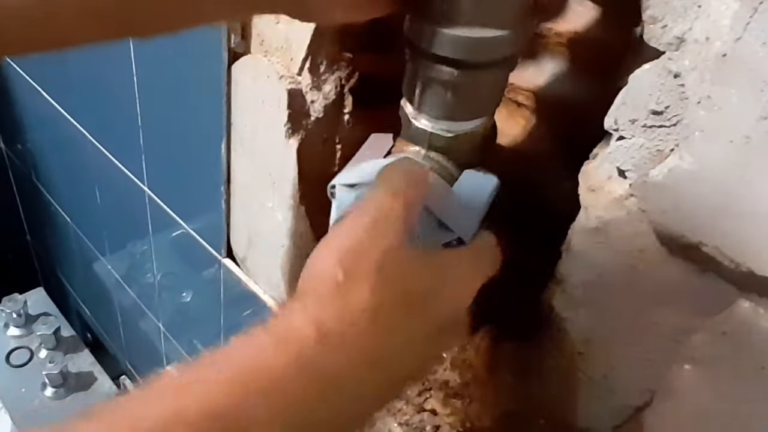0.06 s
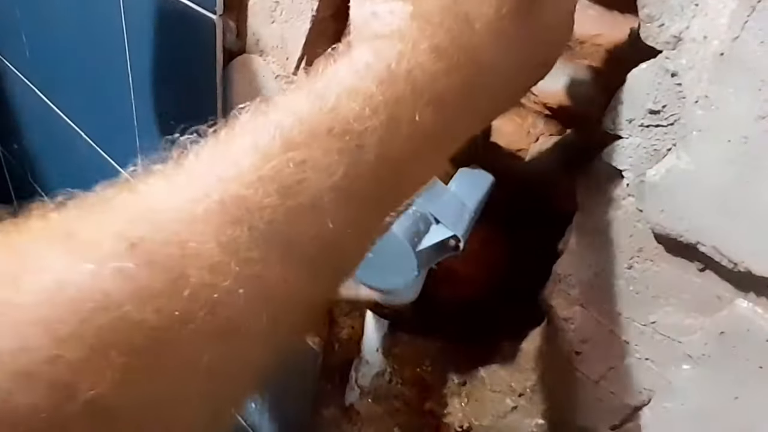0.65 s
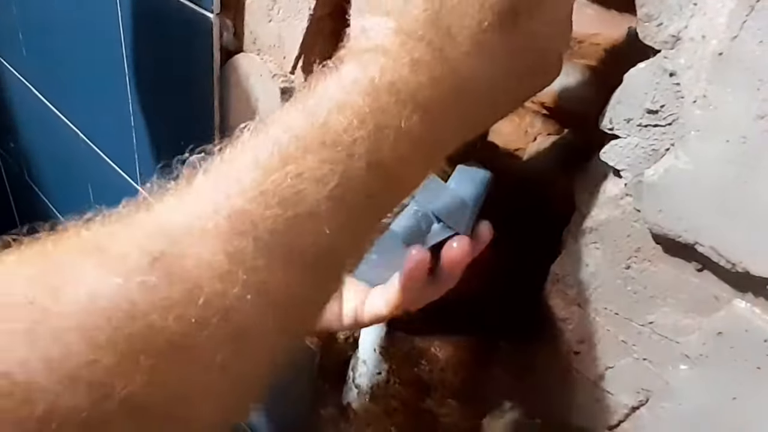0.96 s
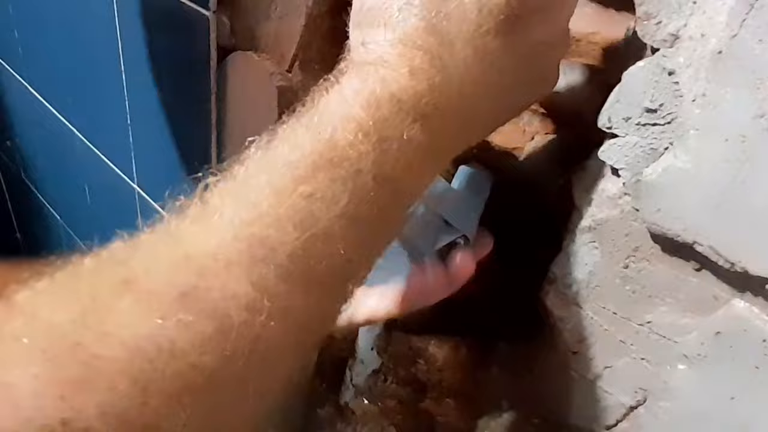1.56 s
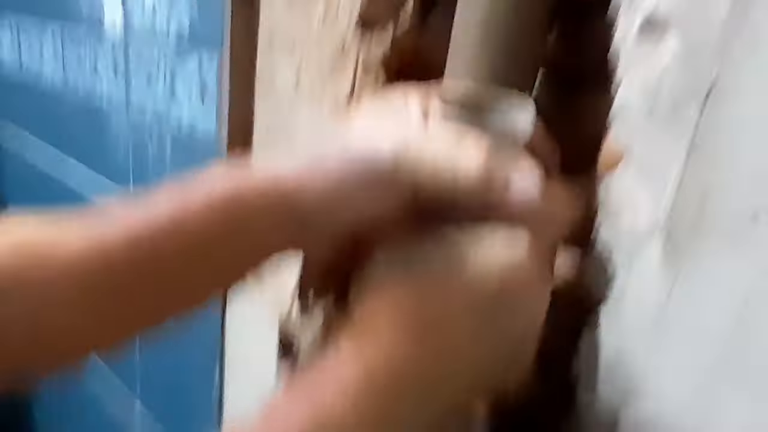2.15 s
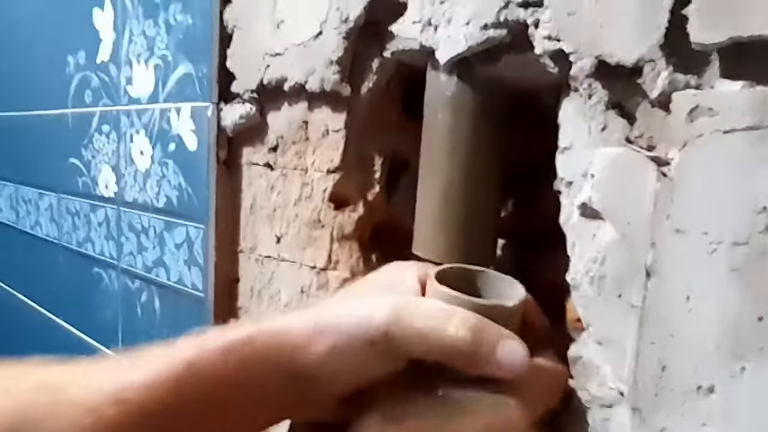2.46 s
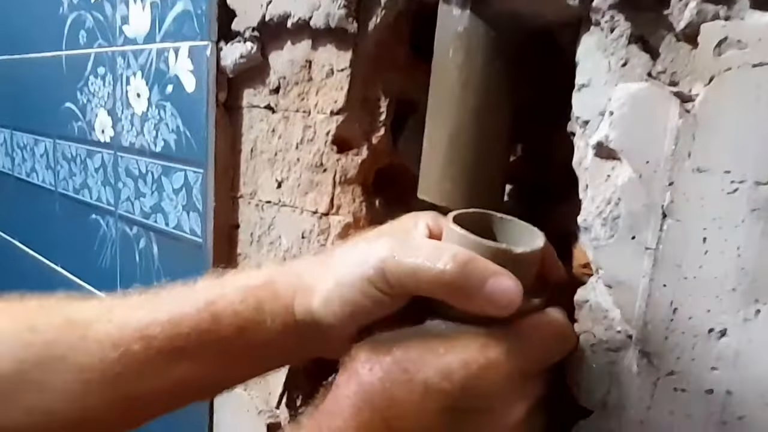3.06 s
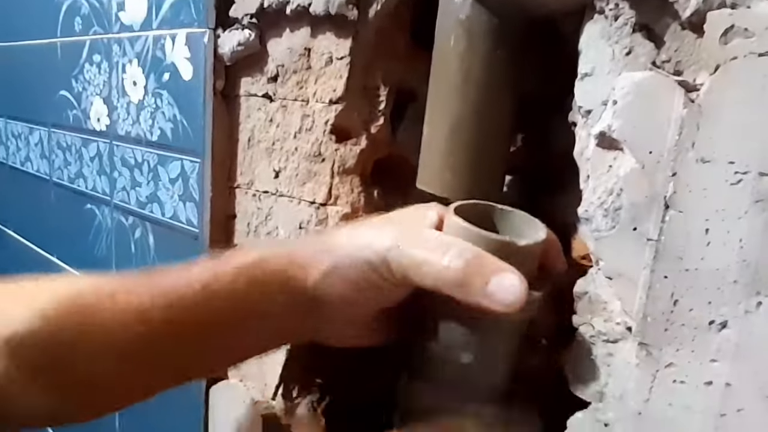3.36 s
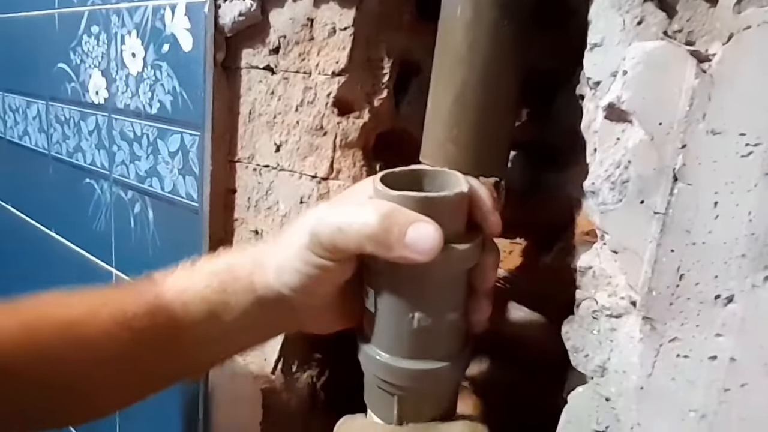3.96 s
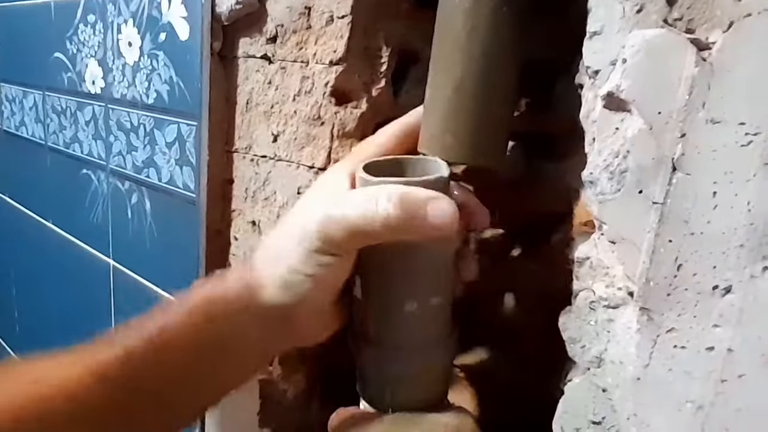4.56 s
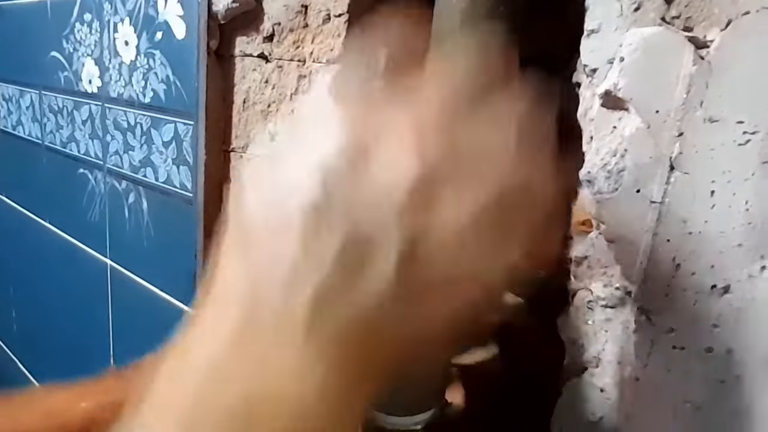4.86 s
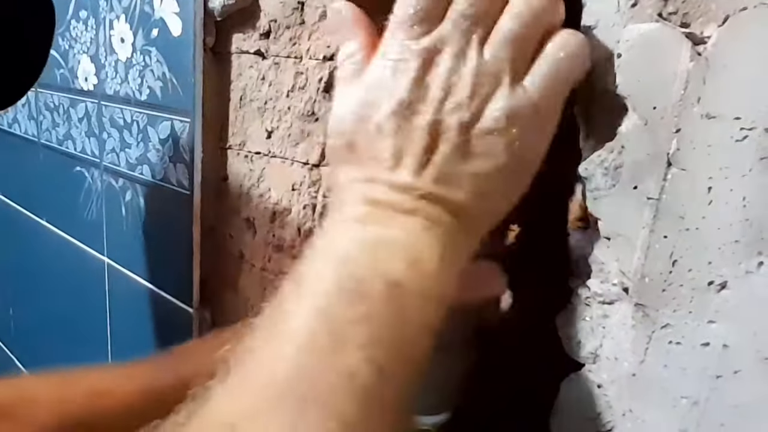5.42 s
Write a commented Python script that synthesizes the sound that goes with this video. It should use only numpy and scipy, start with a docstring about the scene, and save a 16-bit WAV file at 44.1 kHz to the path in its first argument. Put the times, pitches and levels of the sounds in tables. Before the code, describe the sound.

Plastic drain fittings are worked by hand, close to the microphone in a small tiled room. They first give hollow knocks and short scrapes, then the hands rub quietly with small gritty ticks. A shove sets the pipe booming low. The busiest stretch follows, with hard knocks, clicks and tiny squeaks of plastic on plastic, and two more scraping shoves come at the end. Each contact has a short room echo.

```python
"""Plastic drain fittings worked by hand in a broken-out wall recess, close to a stereo pair of
microphones in a small tiled room. First the hollow fitting knocks and its joints slip and scrape, then
the hands rub quietly, grit ticking under them. A shove at 2.5 s shakes the pipe run into a low boom.
From 3.3 s comes the busiest work, with hard knocks and squeaks of plastic on plastic, and two more
shoves follow after 5 s. The tiles answer the contacts throughout."""
import sys
import numpy as np
from scipy import signal
from scipy.fft import rfft, irfft, next_fast_len
from scipy.io import wavfile
from scipy.ndimage import uniform_filter1d

SR = 44100
rng = np.random.default_rng(int(sys.argv[2]) if len(sys.argv) > 2 else 0)


def wav_record(signal):
    """Record a signal, one row per channel, as 16-bit PCM in the file named by sys.argv[1]."""
    frames = np.transpose(np.atleast_2d(signal))
    bounded = np.clip(frames, -1, 1)
    # unit amplitude maps onto the largest positive 16-bit level
    quanta = np.round(bounded * 32767).astype(np.int16)
    wavfile.write(sys.argv[1], SR, quanta)


N = 242010
T = np.arange(SR) / SR  # one second, the span of a single event

# Resonances of the rim and of the hand-held open socket. Each row: centre in Hz, width in Hz, gain in dB.
RIM_MODES = [(1400,480,-11), (1910,326,1.5), (2100,222,1.5), (2310,256,-5)]
SOCKET_MODES = [(603,130,2.5), (790,192,6.5), (1103,436,1), (1610,260,1), (2087,434,-5)]
# Spectra of grit, dry skin and the rumbling pipe run. Each row: frequency in Hz, gain in dB.
GRIT_SPECTRUM = [(1200,-23), (2400,-6), (3200,0), (4500,0), (6500,-0.5), (9000,-2), (12000,-7.5),
                 (15500,-12.5)]
SKIN_SPECTRUM = [(1500,-33.5), (2800,-1), (4000,-6.5), (5800,2.5), (8500,0), (11000,-1), (14000,1),
                 (16000,-4)]
RUMBLE_SPECTRUM = [(25,-37), (38,-22), (47,-12.5), (62,2), (78,-13), (110,-5.5), (140,1), (170,-6.5),
                   (280,-5), (360,-13.5), (520,-16), (900,-28), (2000,-46)]


def knocks(wall_over_cavity=1.646, rim_db=-19.5):
    """Two hand-damped modes make the fitting's hollow 'tok'; their pitches shift together with the grip."""
    # Each row: start in seconds, dry peak in dB, cavity pitch in Hz, wall and crack trims in dB.
    blows = [(.136,-6.5,671,-7,-41), (.422,-14,659,-4,-32), (.592,-9,657,-5,-29.5),
             (.608,-16.5,681,-7,-14.5), (0.824,-14,654,-7,-17.5), (.893,-2.5,613,-5.5,-44),
             (1.001,-23,635,0.5,-20), (1.604,-30.5,615,-3,-8), (2.329,-39.5,634,-34.5,-17),
             (2.465,-16,695,5,-40), (3.373,-6.5,676,-15.5,-28), (3.425,0.5,657,-11,-32),
             (3.957,-22.5,617,-2.5,-19), (4.676,-23.5,631,-10.5,-47), (4.742,-21.5,610,-4.5,-24.5),
             (5.092,-15.5,663,-25,-26), (5.355,-10.5,680,-10,-22), (5.365,-4.5,678,3,5)]
    out = np.zeros((2, N))
    for s, db, cavity_hz, wall_db, crack_db in blows:
        cavity = ring(cavity_hz, t60=0.04, attack=0.001)
        wall = amp(wall_db + 7.5) * ring(wall_over_cavity * cavity_hz, t60=0.031, attack=0.0011)
        rim = amp(rim_db) * unit_energy(resonate(snap(t60=0.017), RIM_MODES))
        crack = amp(crack_db - 2.5) * unit_energy(coloured(snap(t60=0.025), GRIT_SPECTRUM))
        blow = cavity - wall + rim + crack
        add(out, s, in_room(amp(db) * unit_peak(blow), wet_db=-3))
    return out


def click(crack_db):
    """An edge catches and lets go: a short clack of the socket with a sharp crack."""
    crack = brittle(snap(t60=0.011))
    clack = resonate(snap(t60=0.012), SOCKET_MODES)
    return unit_peak(clack) + amp(crack_db) * unit_peak(crack)


def ticks():
    """Plastic edges catch sharply, and the room answers each."""
    # Each row: start in seconds, level in dB, crack against clack in dB.
    catches = [(.585,-22.5,-20.5), (.602,-18.5,-8), (.729,-30,-2.5), (.762,-32.5,0), (1.169,-54,-11),
               (1.971,-42,-15), (2.4695,-17,-7), (2.933,-33,-6), (2.963,-30.5,-11.5), (3.069,-34,-9),
               (3.175,-29.5,-14.5), (3.237,-37.5,-4.5), (3.323,-32,-27), (3.746,-15.5,-7.5), (4.03,-39,1.5),
               (4.128,-39,-12.5), (4.327,-38,-17), (4.348,-38.5,-10.5)]
    out = np.zeros((2, N))
    for s, db, crack_db in catches:
        add(out, s, in_room(amp(db) * click(crack_db), wet_db=-1))
    return out


def thuds(boom_below_hz=80, build_cycles=1.1, detune=0.0074):
    """The long pipe run takes up each jolt slowly, from a shove, a knock or a shifting grip, and booms on in
    its low modes."""
    # Each row: start in seconds, level of the upper modes in dB, level of the deep boom in dB.
    jolts = [(.135,-50,-75), (0.409,-34,-38.5), (0.589,-39,-46.5), (1.92,-41,-51), (2.458,-29.5,-33),
             (3.399,-39,-39.5), (3.729,-24.5,-41), (3.889,-32,-38.5), (5.085,-21.5,-28), (5.353,-26,-26)]
    # Each row: frequency in Hz, gain in dB, t60 in seconds.
    pipe_modes = [(51,0,.87), (59.8,5.5,0.55), (95.6,-3.5,0.57), (114.5,-7,0.84), (138.6,-1.5,0.64),
                  (177.4,-15,1), (204.6,-14,.88), (240.8,-8.5,0.67), (283.4,-15,0.95)]
    out = np.zeros((2, N))
    for s, upper_db, boom_db in jolts:
        boom = np.zeros(SR)
        for hz, mode_db, t60 in pipe_modes:
            build = 1 - np.exp(-T * hz / build_cycles)
            phase = 2 * np.pi * (hz * T * (1 + detune * rng.standard_normal()) + rng.random())
            drive_db = boom_db if hz < boom_below_hz else upper_db
            boom += amp(mode_db + drive_db) * build * fade(t60) * np.sin(phase)
        shudder = pipe_rumble(SR) * fade(t60=0.68) * onset(0.0026)
        add(out, s, boom + amp(upper_db - 6) * shudder)
    return out


def slips(judder_db=4, tilt_db_per_octave=0.5):
    """A joint clicks free; a juddering run of tiny slips rings the cavity and the rim, and crackles."""
    # Each row: start, rise and t60 in seconds, level in dB, brightness in dB.
    slides = [(.104,0.012,0.035,-42,-4.5), (.406,.013,0.16,-26.5,-4.5), (.580,.015,0.16,-26,0),
              (1.645,.035,0.077,-47.5,-9.5), (2.447,.017,.17,-19.5,-4), (3.348,.0052,.16,-20,-3),
              (3.728,.002,0.14,-20.5,3), (3.875,.03,.11,-38.5,2), (4.122,.008,0.098,-39.5,0),
              (4.688,.056,0.14,-34,-4.5), (5.074,.014,0.16,-22,-1), (5.353,.012,0.32,-16.5,1.5)]
    # The fitting's cavity. Each row: centre in Hz, width in Hz, gain in dB.
    hollow_modes = [(502,220,-14), (608,63,2), (664,103,.5), (972,160,-6.5), (1125,82,-4)]
    tilt = lambda hz: amp(tilt_db_per_octave * np.log2(np.maximum(hz, 2500)))
    out = np.zeros((2, N))
    for s, rise, t60, db, bright_db in slides:
        speed = stroke(T, rise, rise, t60)
        force = speed * grains(SR, per_s=4100, spread_db=1.5)
        juddering = force * amp(judder_db * wander(below_hz=220))
        crackle = filtered(coloured(juddering, GRIT_SPECTRUM), tilt)
        rim = amp(-7.5) * unit(resonate(juddering, RIM_MODES))
        hiss = amp(-15) * patchy(crackle, depth_db=3.5)
        hollow = unit(resonate(force, hollow_modes))
        scrape = (hollow + amp(bright_db) * (rim + hiss)) * rms(speed)
        breakaway = amp(-0.5) * np.exp(-rise / 0.022) * click(bright_db - 12.5)  # softer in slow slips
        add(out, s, in_room(amp(db) * (scrape + breakaway), wet_db=0.05))
    return out


def squeaks(length_s=0.0077, sag=0.21, wobble_rad=0.67):
    """A few cycles of stick-slip, falling in pitch as the plastic surfaces let go."""
    # Each row: start in seconds, relative level in dB, middle pitch in Hz.
    chirps = [(2.335,-48.5,1610), (3.349,-20,1330), (3.359,-19.5,1867), (3.4213,-20.5,1770),
              (3.669,-31,1600), (3.895,-33,1590), (4.029,-42.5,1810)]
    out = np.zeros((2, N))
    for s, db, hz in chirps:
        pitch = hz * (1 + sag * (0.5 - np.minimum(T / length_s, 1)))
        phase = 2 * np.pi * np.cumsum(pitch) / SR + wobble_rad * wander(below_hz=400)
        add(out, s, in_room(amp(db + 2) * swell(length_s) * np.sin(phase), wet_db=-2.5))
    return out


def scuffs(width_hz=4000):
    """Dry skin skids on dusty plastic in brief, bright crackles."""
    # Each row: start in seconds, relative level in dB, centre in Hz, t60 in seconds.
    skids = [(.267,-56.5,9360,0.065), (.878,-45,7450,0.04), (0.954,-48.5,8020,0.057),
             (1.461,-48.5,10020,0.0273), (1.47,-64,12500,0.438), (1.812,-53.5,11000,0.043),
             (3.628,-26,11580,0.013), (3.654,-41,11500,.08), (4.365,-60.5,13000,0.07),
             (4.6,-52.5,9860,0.027), (4.931,-38,10700,0.027), (5.185,-40.5,11280,0.023)]
    out = np.zeros((2, N))
    for s, db, hz, t60 in skids:
        speed = onset(0.0014) * fade(t60)
        friction = coloured(speed * grains(SR, per_s=4800, spread_db=3), SKIN_SPECTRUM)
        crackle = unit(resonate(friction, [(hz, width_hz, 0)])) * rms(speed)
        add(out, s, in_room(amp(db + 4) * crackle, wet_db=-2.5))
    return out


def strains():
    """Steady force makes the pipe run drone in two low modes."""
    # Each row: start and length in seconds, level in dB.
    pushes = [(0,0.36,-48), (2.331,0.082,-52.5), (3.55,0.17,-42.5), (4.86,0.26,-48.5)]
    out = np.zeros((2, N))
    for s, length, db in pushes:
        modes = resonate(rng.standard_normal(SR), [(60.9, 8.6, 2.5), (141, 5.5, 9.5)])
        drone = coloured(modes, [(30, -21), (50, 0.5), (160, -6.5), (400, -15)])
        add(out, s, amp(db) * swell(length) * unit(drone)[None])
    return out


def grips():
    """Palms shift their hold with a muffled shuffle."""
    # Each row: start and length in seconds, level in dB.
    shifts = [(1.896,0.153,-41), (2.155,0.17,-61.5), (3.222,0.18,-43)]
    # Each row: frequency in Hz, gain in dB.
    palm_spectrum = [(60,-11), (130,-7.5), (240,3.5), (330,-1.5), (420,-11), (560,-7.5), (900,-27),
                     (2000,-29), (4000,-58.5)]
    out = np.zeros((2, N))
    for s, length, db in shifts:
        shuffle = coloured(grains(SR, per_s=360, spread_db=6.5), palm_spectrum)
        add(out, s, in_room(amp(db) * swell(length) * unit(shuffle), wet_db=-2))
    return out


def hands(grit_db=-11.5):
    """Palms drag over dusty plastic: a dull rumble, a hollow rub with stray ticks, and a gritty hiss."""
    # Each row: start and length in seconds, relative levels of rumble, rub and hiss in dB.
    drags = [(0,0.33,-50.5,-59,-66), (0.584,.36,-37.5,-44,-65), (1.584,0.103,-70,-62,-57),
             (1.884,0.046,-45,-56,-56), (2.19,0.051,-62,-67.5,-74), (2.326,.08,-52,-64,-77),
             (2.819,0.3,-53,-50.5,-61.5), (3.186,0.23,-44.5,-41,-51), (3.379,0.29,-42,-37,-51),
             (3.82,.22,-50,-48,-55.5), (4.091,.28,-51,-57.5,-69.5), (4.697,0.2,-52.5,-64,-59.5),
             (5.105,0.19,-44,-46.5,-60.5)]
    t = np.arange(N) / SR
    rumble, rub, hiss = sum(np.outer(amp(levels_db), stroke(t - s, 0.053, length, t60=0.42))
                            for s, length, *levels_db in drags)
    body = unit(resonate(grains(N, per_s=410, spread_db=2), SOCKET_MODES))
    caught = grains(N, per_s=48, spread_db=1)
    grit = unit(resonate(caught, RIM_MODES)) + amp(-11.5) * unit(brittle(caught))
    dust = patchy(coloured(grains(N, per_s=8600, spread_db=2), SKIN_SPECTRUM), depth_db=5.5)
    friction = amp(-5) * rub * (body + amp(grit_db) * grit) + amp(-4) * hiss * dust
    return in_room(friction, wet_db=-2) + amp(-3) * rumble * pipe_rumble(N)


def pipe_rumble(n):
    """The dull stereo noise of the shaken pipe run."""
    return unit(coloured(diffuse(n), RUMBLE_SPECTRUM))


def in_room(x, wet_db):
    """The direct sound, a quick splash off the bricks of the recess, and the answer of the tiled walls."""
    # The room's decay. Each row: frequency in Hz, t60 in seconds.
    decay = [(60,0.66), (300,.45), (650,0.52), (1100,.37), (2400,0.59), (6400,0.34), (15000,0.33)]
    # Standing waves in the recess. Each row: centre in Hz, width in Hz, gain in dB.
    recess_modes = [(497.3,6.8,2), (617.5,53,-11.5), (710,12,-2.5), (1125,7.7,5)]
    hz, t, spectra = signal.stft(diffuse(SR), SR, nperseg=256)
    spectra = spectra * amp(-60 * t / along(decay, hz)[:, None])
    tail = signal.istft(spectra, SR, nperseg=256)[1][:, :SR] * onset(0.00089)
    standing = lambda f: 1 + sum(amp(db) * 1j * f * w / (c * c - f * f + 1j * f * w)
                                 for c, w, db in recess_modes)
    answer = signal.fftconvolve(x[None], filtered(tail, standing), axes=1)[:, :len(x)]
    # close bricks on either side pull the two microphones apart in the upper middle
    brick_spectrum = [(400, -10), (1000, -10), (2000, 0), (4000, 6.5), (7000, -1), (14000, -10.5)]
    splash = coloured(unit_energy(snap(t60=0.03)), brick_spectrum)
    side = amp(-2) * signal.fftconvolve(x, splash)[:len(x)]
    return (np.array([x + side, x - side]) + amp(wet_db) * unit(answer) * np.std(x)) * amp(-1.5)


def room_tone(level_db=-66.5):
    """The still air of the room, faint and steady."""
    # Each row: frequency in Hz, gain in dB.
    air_spectrum = [(25,-14), (60,6), (130,-5), (400,-14), (650,-18.5), (1500,-18.5), (4000,-31),
                    (6500,-27.5), (8500,-21.5), (11500,-23.5), (16000,-28.5)]
    return amp(level_db) * unit(coloured(diffuse(N), air_spectrum))


def diffuse(n):
    """Stereo noise as two close microphones hear a room: alike in the bass."""
    # Each row: frequency in Hz, left-right correlation.
    likeness = [(60,0.76), (300,0.96), (650,0.22), (1100,-.049), (2000,-0.046), (4000,0.72), (8000,0.65),
                (14000,0.77)]
    angle = lambda hz: np.arccos(np.clip(along(likeness, hz), -1, 1)) / 2
    shares = lambda hz: np.array([np.cos(angle(hz)), np.sin(angle(hz))])
    mid, side = filtered(rng.standard_normal((2, n)), shares)
    return np.array([mid + side, mid - side])


def grains(n, per_s, spread_db):
    """Micro-slips: random impulses of uneven size."""
    impulses = (rng.random(n) < per_s / SR) * rng.standard_normal(n)
    return unit(impulses * amp(spread_db * rng.standard_normal(n)))


def ring(hz, t60, attack):
    """One damped mode of energy 1."""
    return unit_energy(np.sin(2 * np.pi * hz * T) * fade(t60) * onset(attack))


def snap(t60):
    """The brief noisy force of a hard contact."""
    return rng.standard_normal(SR) * fade(t60)


def brittle(x, centre_hz=7000, width_hz=1500, ring_db=6):
    """Grit colour plus the ring of one small edge, its pitch drawn anew at each call."""
    hz = centre_hz * np.exp(0.06 * rng.standard_normal())
    grit = coloured(x, GRIT_SPECTRUM)
    return grit + amp(ring_db) * resonate(grit, [(hz, width_hz, 0)])


def patchy(x, depth_db):
    """The contact patch keeps changing, so the colour of a scrape shifts from moment to moment."""
    spectra = signal.stft(x, nperseg=256)[2]
    patches = uniform_filter1d(rng.standard_normal(spectra.shape), size=11, axis=0)
    patches = unit(uniform_filter1d(patches, size=9, axis=1))
    return unit(signal.istft(spectra * amp(depth_db * patches), nperseg=256)[1][:len(x)])


def wander(below_hz):
    """One second of low-passed noise at rms 1."""
    return unit(filtered(rng.standard_normal(SR), lambda hz: hz < below_hz))


def stroke(t, rise, length, t60):
    """Speed of a movement: it rises, holds until length, and dies away."""
    return np.clip(t / rise, 0, 1) * amp(-60 * np.maximum(t - length, 0) / t60)


def onset(attack_s):
    """One second of exponential rise towards 1."""
    return 1 - np.exp(-T / attack_s)


def fade(t60):
    """One second of decay, falling 60 dB in t60 seconds."""
    return amp(-60 * T / t60)


def swell(length):
    """One second holding a single smooth rise and fall."""
    return np.sin(np.pi * np.clip(T / length, 0, 1))


def resonate(x, modes):
    """x through (centre Hz, width Hz, dB) resonances of alternating sign."""
    return filtered(x, lambda f: sum(
        (-1) ** k * amp(db) * c * w / (c * c - f * f + 1j * f * w) * f / (f + c)
        for k, (c, w, db) in enumerate(modes)))


def coloured(x, spectrum):
    """x shaped by (Hz, dB) points."""
    return filtered(x, lambda hz: amp(along(spectrum, hz)))


def filtered(x, response):
    """x through a frequency response."""
    n = x.shape[-1]
    padded = next_fast_len(n + SR // 4)
    return irfft(rfft(x, padded) * response(np.fft.rfftfreq(padded, 1 / SR)), padded)[..., :n]


def along(points, hz):
    """(Hz, value) points joined on a log axis."""
    freqs, values = np.transpose(points)
    return np.interp(np.log(hz + 1), np.log(freqs + 1), values)


def amp(db):
    """Decibels to gain."""
    return 10 ** (np.asarray(db) / 20)


def rms(x):
    """Root mean square."""
    return np.sqrt(np.mean(x ** 2) + 1e-20)


def unit(x):
    """Scaled to rms 1."""
    return x / rms(x)


def unit_energy(x):
    """Scaled to energy 1 per channel."""
    return unit(x) / np.sqrt(x.shape[-1])


def unit_peak(x):
    """Scaled to peak 1."""
    return x / np.abs(x).max()


def add(out, s, x):
    """Mix x into out from s seconds on."""
    start = round(s * SR)
    out[:, start:start + x.shape[-1]] += x[:, :N - start]


def scene():
    """All contacts over the room tone; the knocks sit a little nearer the right microphone."""
    blows = knocks() * amp([[-0.4], [0.4]]) + ticks() + thuds()
    rubbing = slips() + squeaks() + scuffs() + strains() + grips() + hands()
    return blows + rubbing + room_tone()


def record(dry):
    """The treble ends sharply at 15950 Hz."""
    return filtered(dry, lambda hz: hz < 15950)


dry = scene()
out = record(dry)
wav_record(out)
```